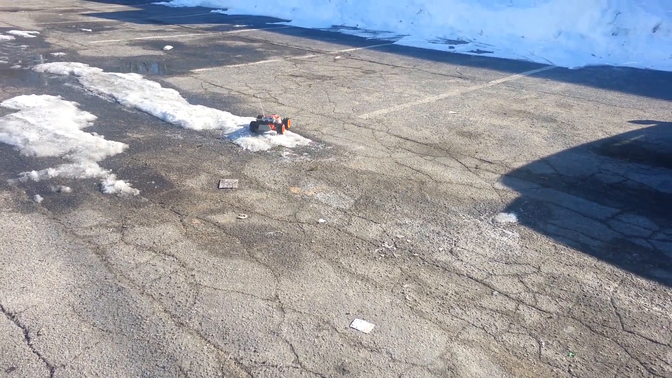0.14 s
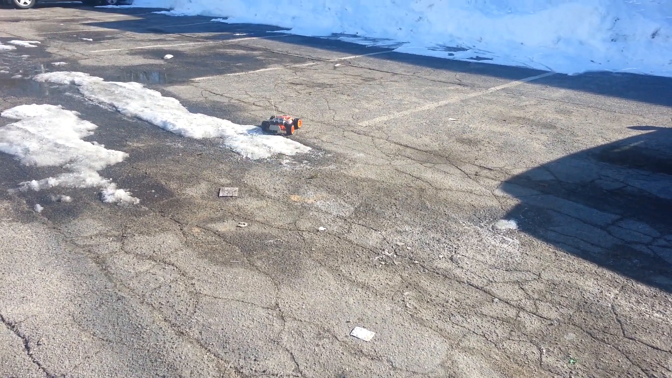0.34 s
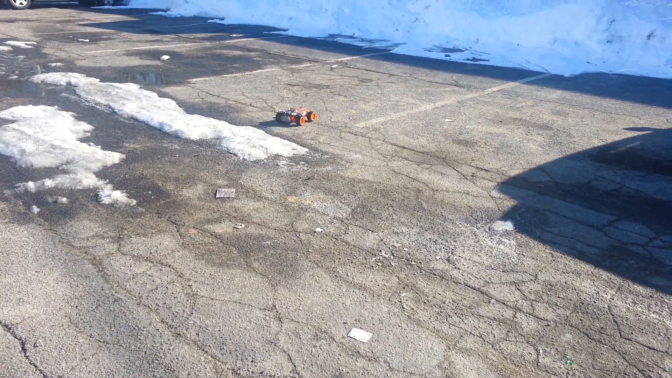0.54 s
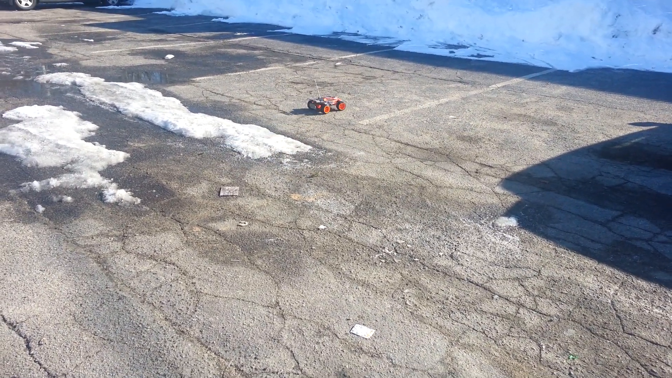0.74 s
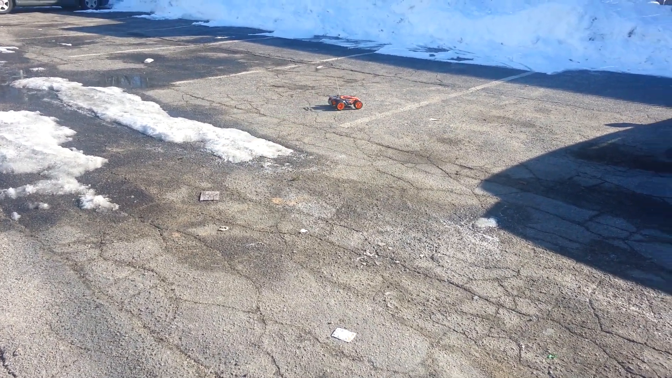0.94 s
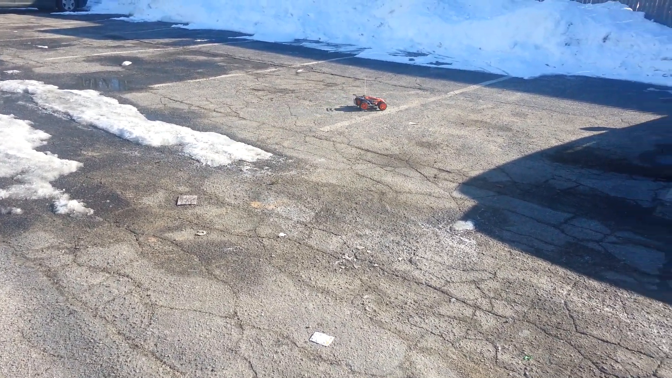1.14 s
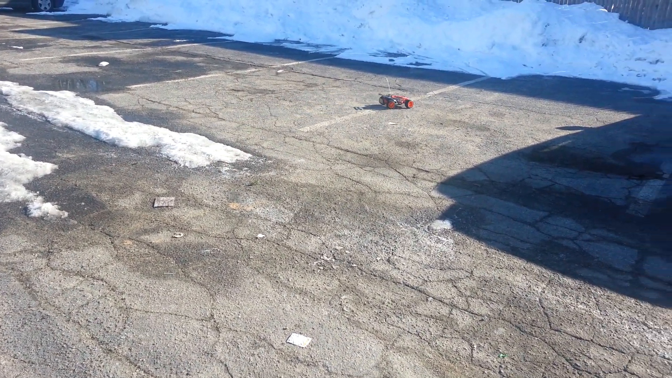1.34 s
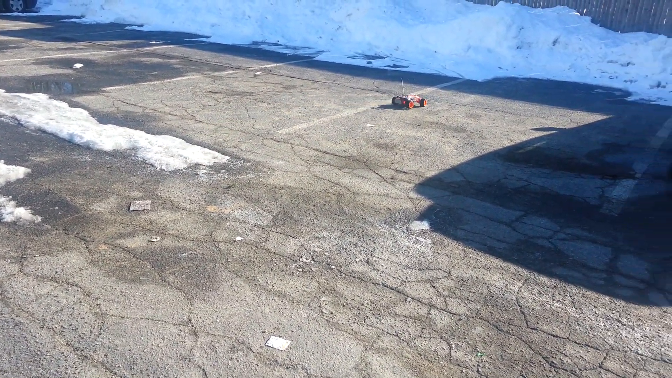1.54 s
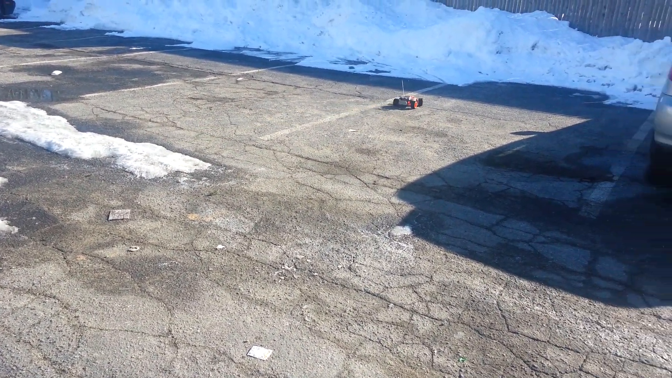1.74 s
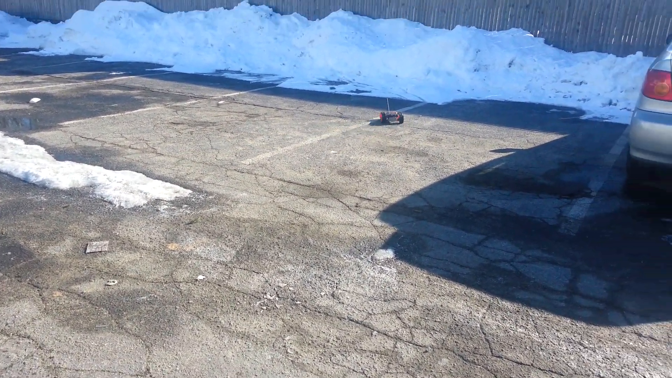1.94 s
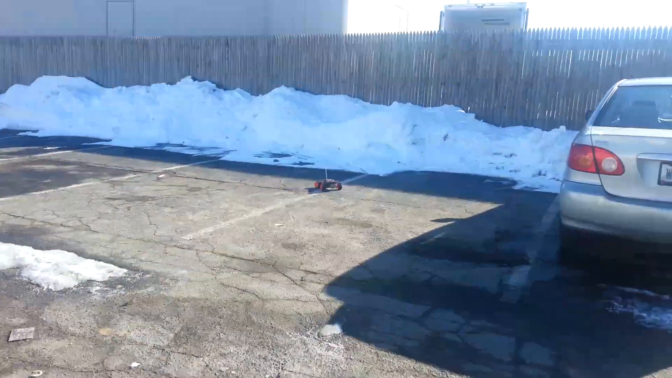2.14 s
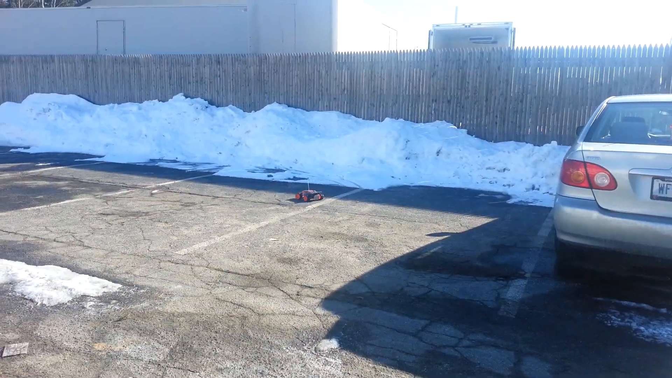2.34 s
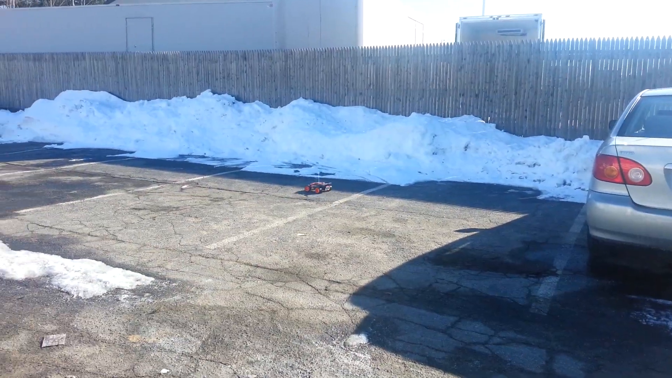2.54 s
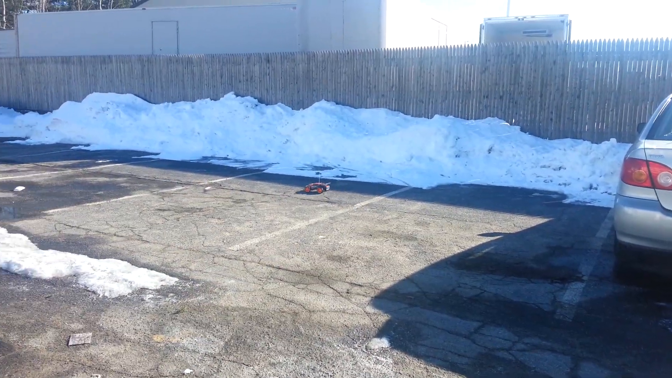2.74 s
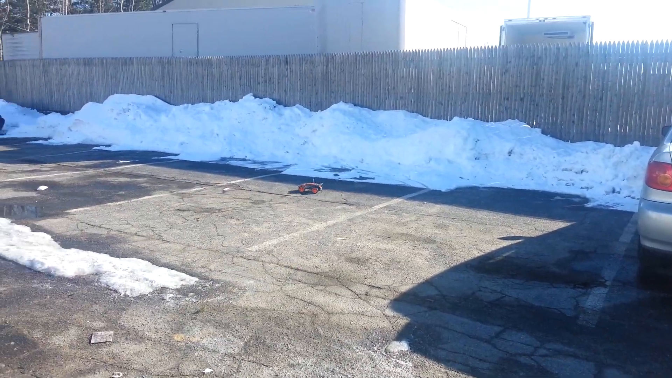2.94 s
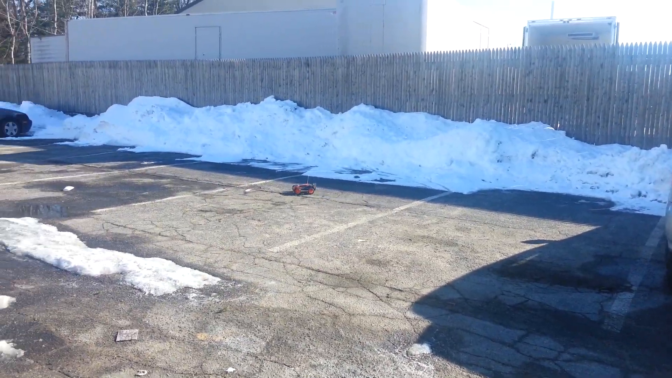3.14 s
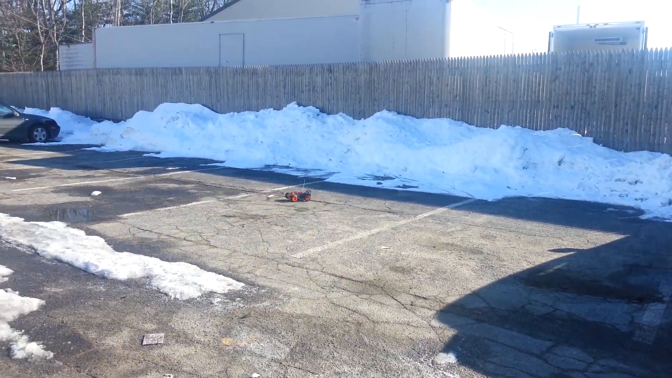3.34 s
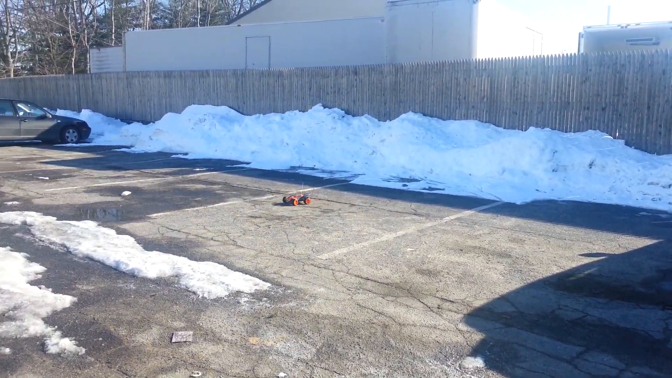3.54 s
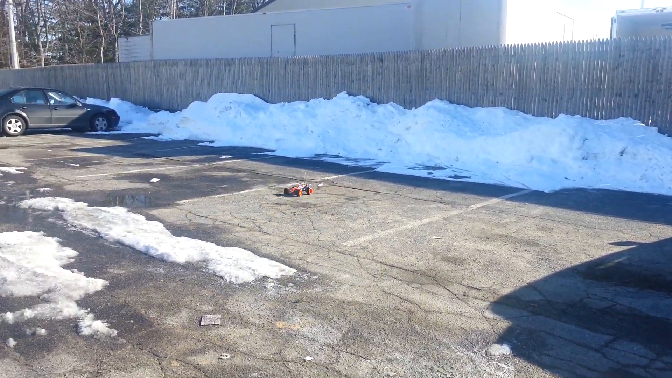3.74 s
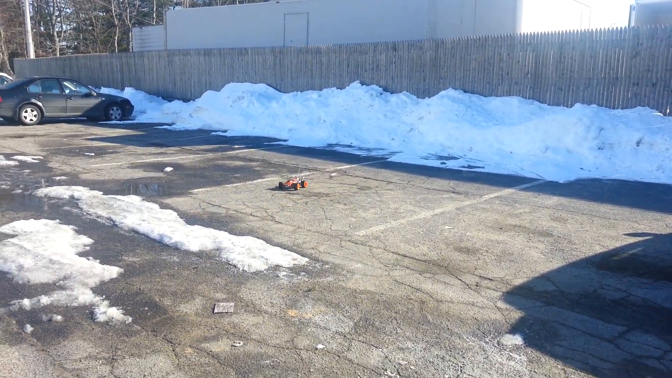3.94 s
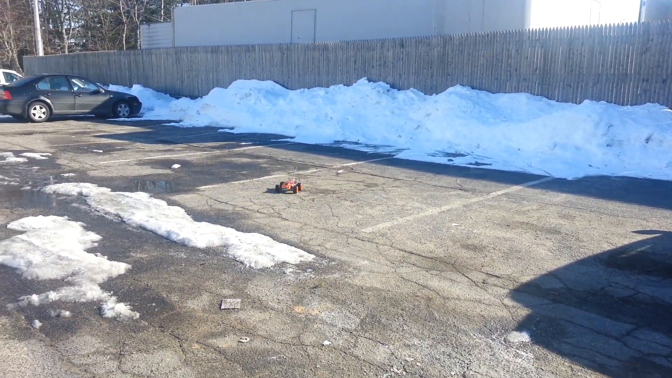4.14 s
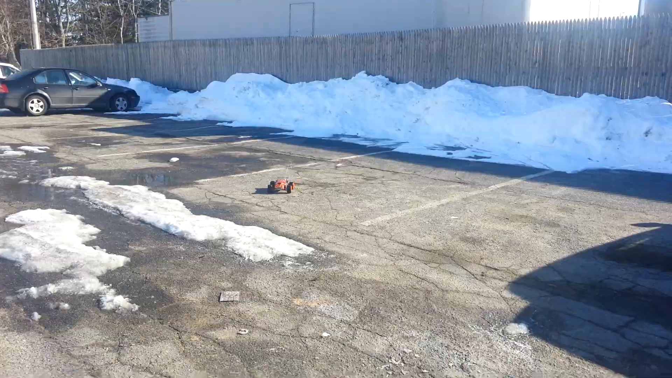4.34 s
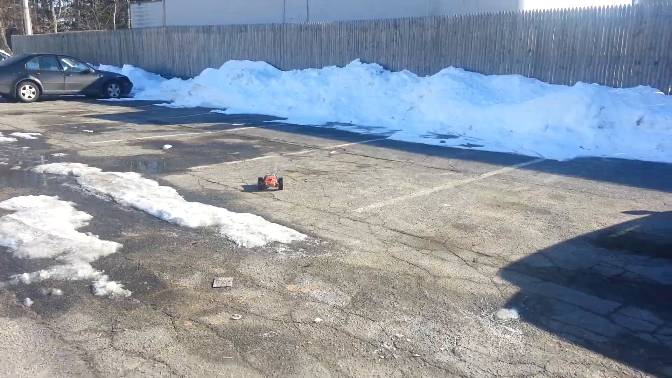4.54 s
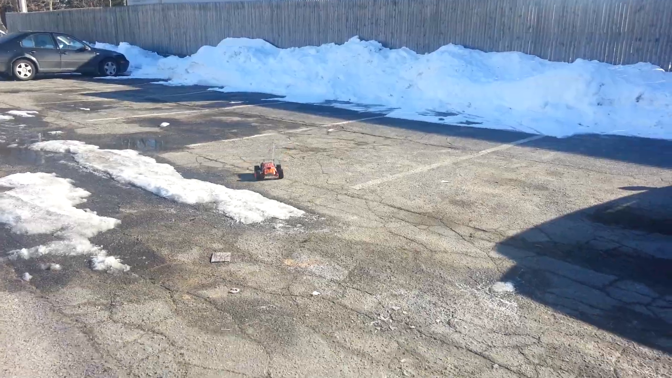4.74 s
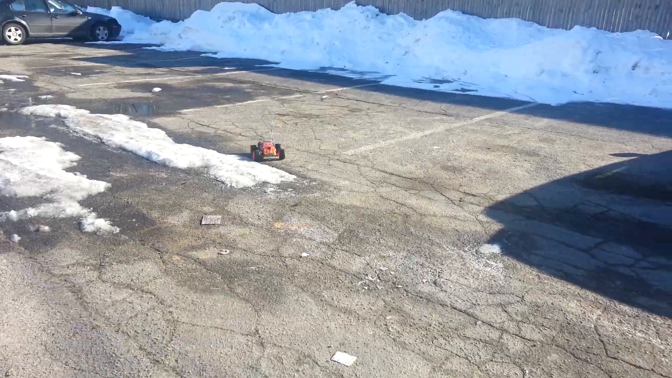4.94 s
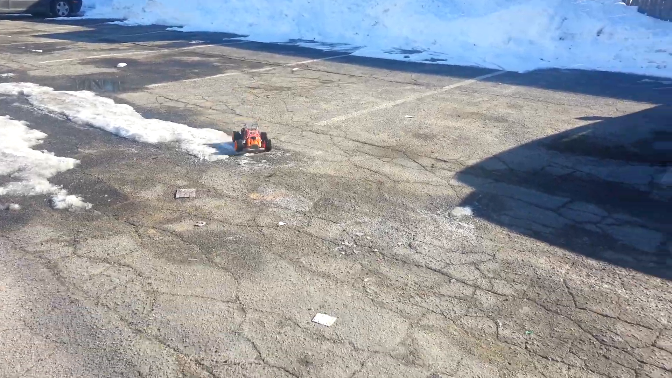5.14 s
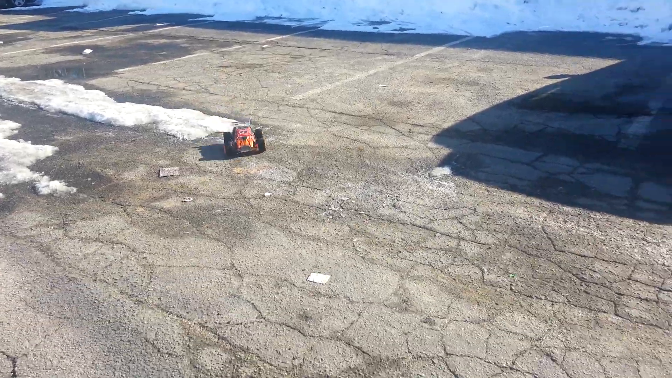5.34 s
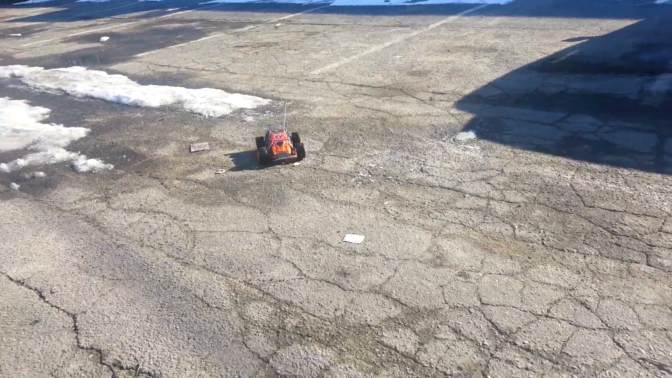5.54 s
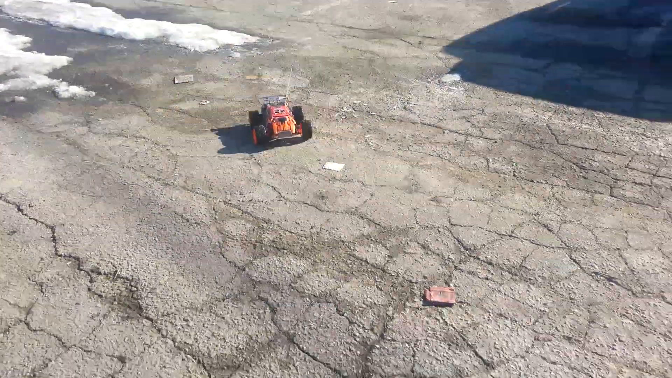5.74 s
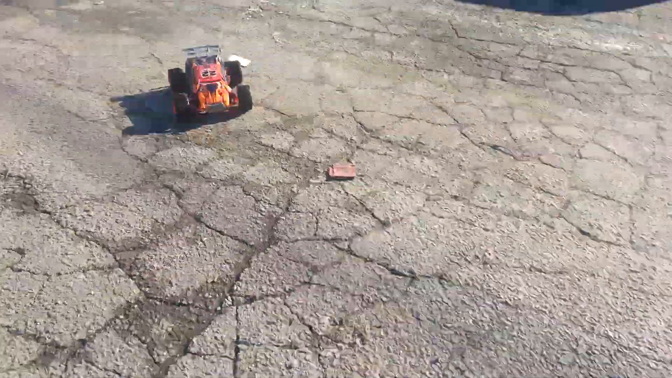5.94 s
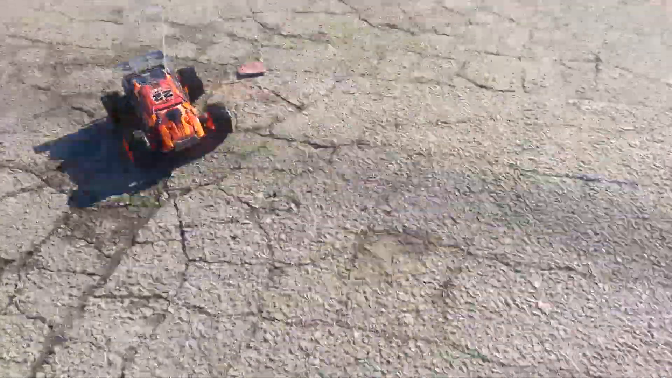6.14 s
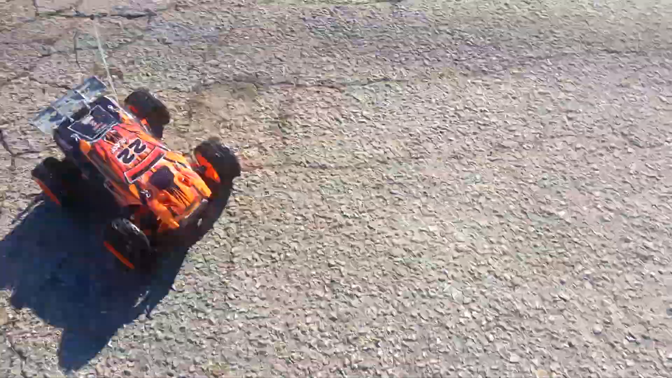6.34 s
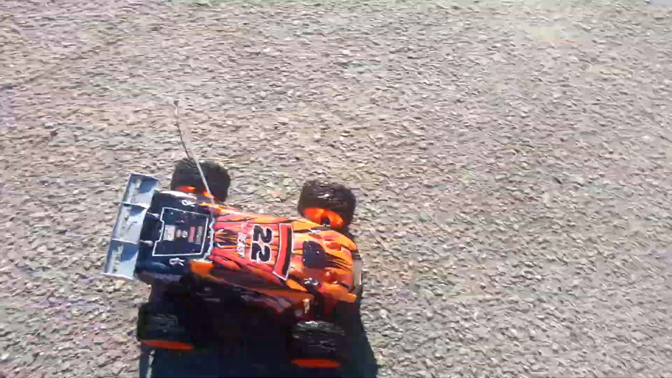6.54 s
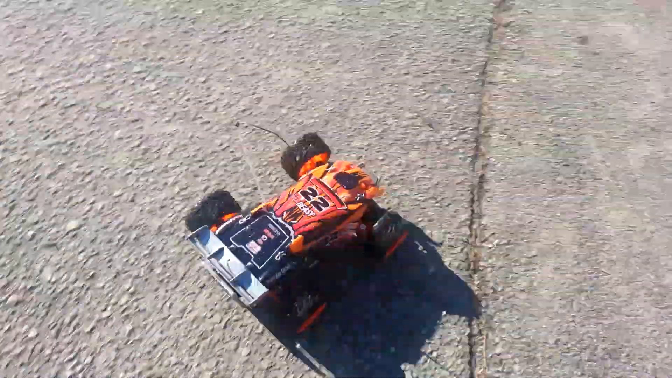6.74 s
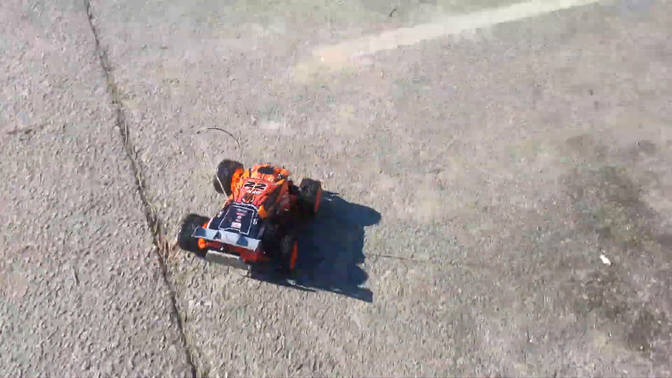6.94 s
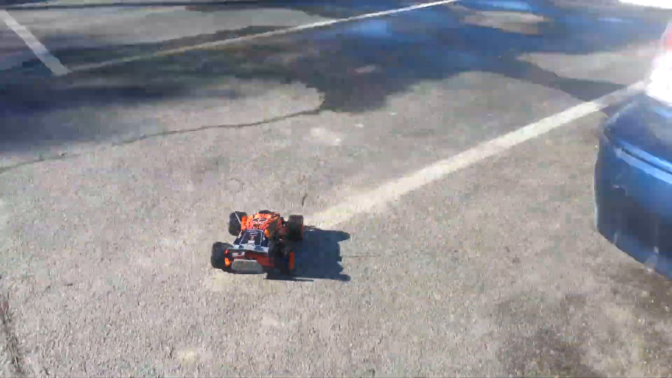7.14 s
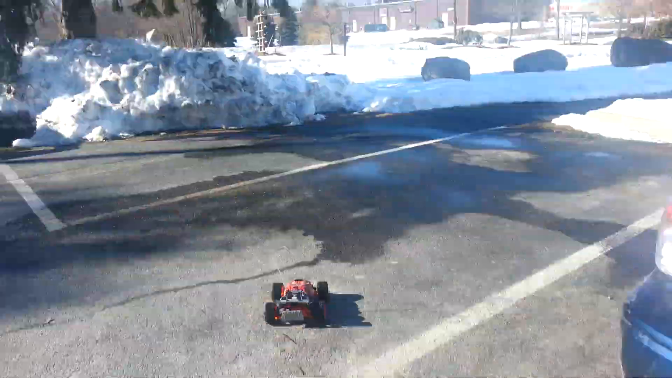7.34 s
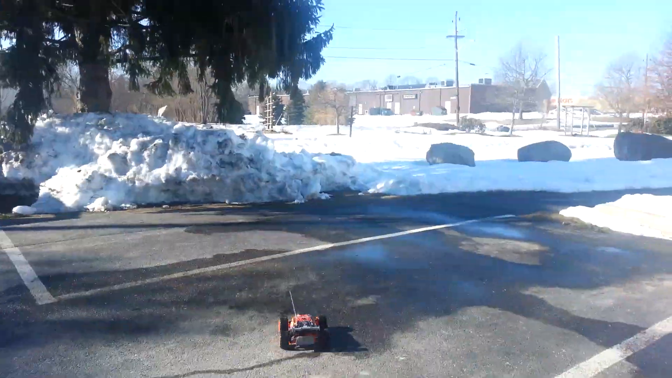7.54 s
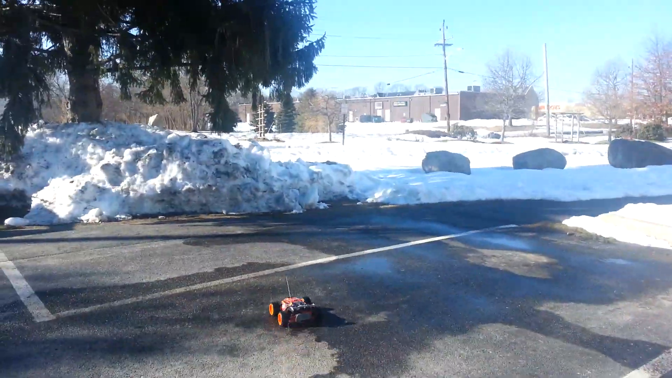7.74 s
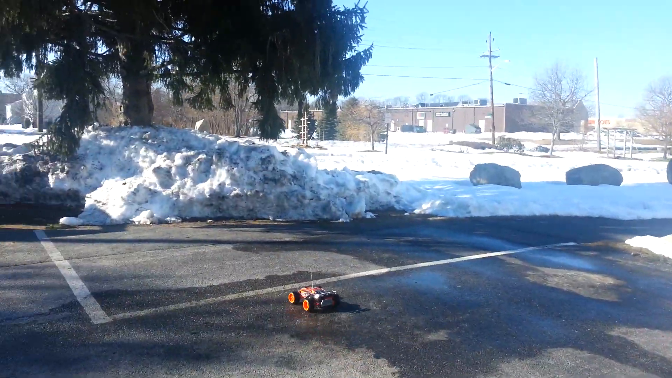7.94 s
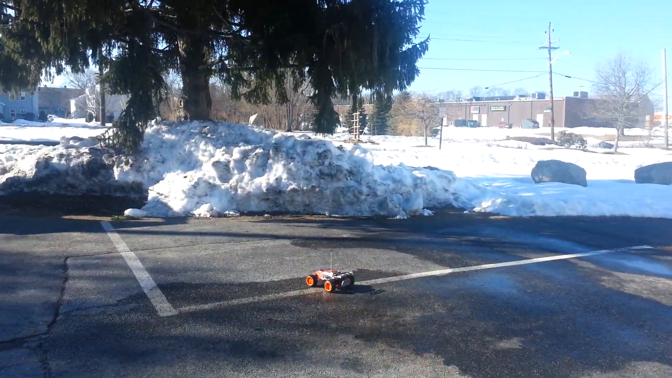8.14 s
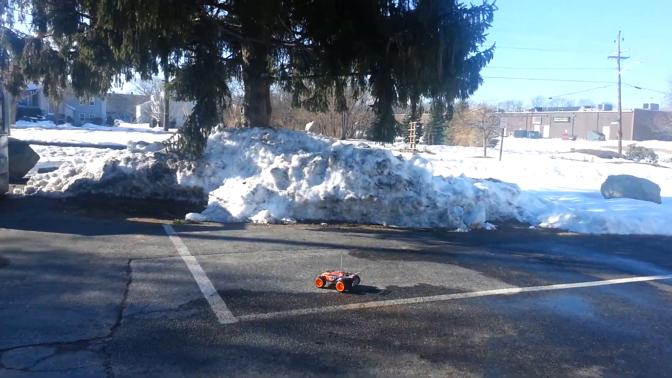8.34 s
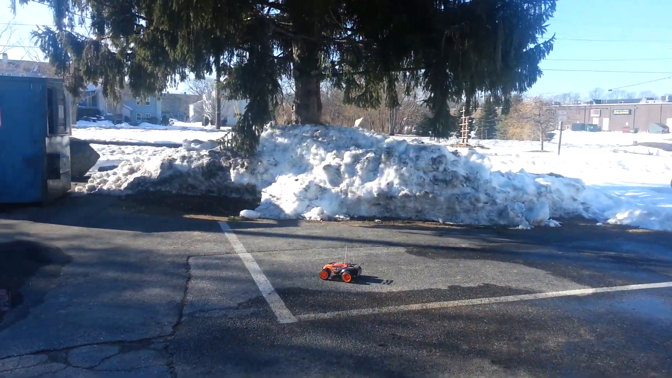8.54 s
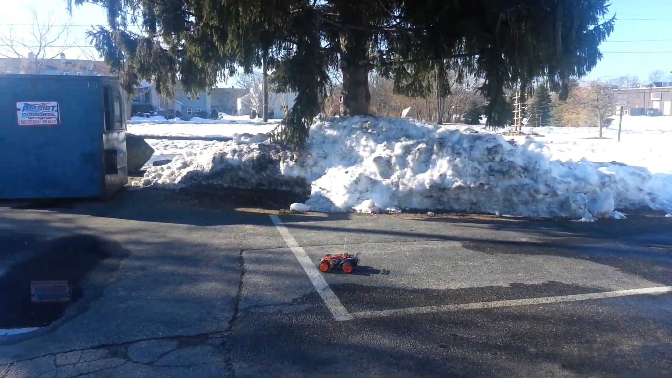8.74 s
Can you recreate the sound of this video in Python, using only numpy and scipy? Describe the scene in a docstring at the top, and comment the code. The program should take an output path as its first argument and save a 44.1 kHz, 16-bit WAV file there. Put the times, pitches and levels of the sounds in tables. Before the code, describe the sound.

A toy buggy's thin electric whine, raspy gears and rattling shell move over rough asphalt, first fairly near, then distant and faint above a soft hum. It comes back louder with quick pitch-bending whines and knocks, peaks loudly close to the handheld stereo microphone with low thuds and air stronger on the left, then drives off, still whining and clacking.

```python
"""A battery toy buggy drives away over cracked asphalt, its gears whining at the motor's speed.
It turns and comes back; the shell rattles, the tyres crunch grit, and the whine swells and bends briefly.
It passes close under the camera with clacks, thumps and a puff of air strongest on the left, then leaves.
Sines make the whines; filtered noise and random blows make the rest, over a faint distant hum."""
import sys
import numpy as np
from scipy import signal
from scipy.fft import rfft, irfft, next_fast_len
from scipy.io import wavfile
from scipy.ndimage import map_coordinates

SR = 44100
rng = np.random.default_rng(int(sys.argv[2]) if len(sys.argv) > 2 else 0)


def wav_record(signal):
    """Record a signal, one row per channel, as 16-bit PCM in the file named by sys.argv[1]."""
    frames = np.transpose(np.atleast_2d(signal))
    bounded = np.clip(frames, -1, 1)
    # unit amplitude maps onto the largest positive 16-bit level
    quanta = np.round(bounded * 32767).astype(np.int16)
    wavfile.write(sys.argv[1], SR, quanta)


N = 387198

# All source levels hold ahead of the port response; spectra give shape only, before each is levelled.
# motor speed: time_s, mesh_pitch_hz
MOTOR_SPEED = [(0, 1295), (.09, 1474), (.115, 1777), (.15, 2015), (.225, 1725), (.27, 1920), (.325, 1772),
               (.4, 1910), (.44, 1620), (.48, 1500), (.505, 1464), (.96, 1471), (1.0, 2086), (1.95, 1898),
               (2.37, 1873), (2.82, 1937), (3.05, 2300), (3.5, 2370), (4.1, 2257), (4.2, 1930),
               (4.26, 2266), (4.41, 2330), (4.43, 1436), (4.7, 1457), (4.8, 1681), (5.03, 1712),
               (5.13, 1910), (5.51, 1798), (5.555, 1940), (5.59, 1830), (5.645, 1953), (5.675, 1864),
               (5.73, 1890), (5.82, 1912), (5.88, 2036), (6.5, 2100), (7.04, 2270), (7.22, 2192),
               (7.28, 1912), (7.55, 1868), (7.78, 1686), (8.05, 1450), (8.27, 1403), (8.36, 1837)]
# loudness of the buggy as it leaves, turns, passes close and leaves: time_s, level_db
NEARNESS_CURVE = [(0, -35.5), (.8, -36), (1.3, -38.5), (1.45, -42), (2, -45), (2.8, -44.5), (3.7, -41.5),
                  (4.3, -41), (4.6, -37.5), (5.25, -36.5), (5.45, -34), (6.3, -28), (6.56, -21),
                  (6.85, -22), (7.2, -30.5), (7.55, -36), (8.2, -37.5), (8.78, -40)]
# mesh tone against the nearness: time_s, level_db
WHINE_CURVE = [(0, -1.5), (.3, -4), (.5, -4), (.75, -2.5), (.85, -11), (1.1, -14), (1.9, -9), (2.1, 2),
               (2.25, -2), (2.4, 1), (2.6, 4), (3.3, -1), (4, -6), (4.36, -2), (4.47, -2), (4.68, -3),
               (5.05, -1.5), (5.43, -2.5), (5.55, 9), (5.715, 5), (5.75, -8), (5.8, 5), (5.9, -7),
               (6.38, -36), (6.55, -9), (6.9, -4.5), (7.2, -6.5), (7.6, -2.5), (7.92, -6), (8.08, -1.5),
               (8.25, -4), (8.33, -5), (8.78, -0.5)]
# brief swells of the whine with their own pitch (bites of the tyres, a motor flare, held notes):
# peak_s, half_height_width_s, pitch_hz, glide_hz_per_s, mesh_db, octave_db, twelfth_db
WHINE_SWELLS = [(.138, 0.021, 1950, 5000, -39, -33, -40), (.168, 0.017, 2000, -10000, -29, -34, -49),
                (0.277, 0.03, 1925, -1500, -30, -33, -41), (.36, 0.016, 1900, 2000, -30.5, -38, -45),
                (0.388, 0.023, 1940, 500, -31, -35, -46), (2.365, 0.013, 1880, -2000, -32, -62, -59),
                (2.495, 0.014, 1930, -2500, -34.5, -55, -55), (3.147, 0.015, 2450, -7000, -40, -57, -57),
                (3.238, .02, 2300, -6000, -37.5, -55, -59), (3.582, 0.017, 2380, -7000, -47, -57, -58),
                (3.67, 0.019, 2350, -8000, -39, -55, -54), (5.138, .028, 1930, 3000, -25.5, -45, -49),
                (5.161, 0.021, 1860, -6000, -27, -49, -50), (5.228, 0.025, 1980, -6000, -25.5, -40, -49),
                (5.291, 0.0171, 1950, -14000, -22.5, -33, -42),
                (5.331, 0.021, 1950, -6000, -21.5, -38, -48), (5.383, .015, 1980, -19000, -19.5, -34, -44),
                (5.488, 0.024, 1880, -7000, -21.5, -36, -42), (5.54, .014, 1890, 4000, -25, -37, -38),
                (5.567, 0.02, 1945, -8000, -22.5, -41, -45), (5.615, .031, 1870, 2000, -23.5, -38, -46),
                (5.642, .016, 2010, 3000, -36, -33, -46), (5.662, 0.0091, 1930, -15000, -21, -35, -44),
                (5.695, 0.027, 1890, 0, -22.5, -40, -46), (5.75, 0.019, 2140, 2000, -42, -30, -48),
                (5.783, 0.016, 1930, -11000, -21, -33, -37), (5.811, 0.021, 1920, -1000, -23, -33, -34),
                (5.843, 0.021, 2020, 1000, -35, -27.5, -32), (5.884, .025, 2070, -1000, -28.5, -28, -33),
                (5.991, 0.019, 2050, 2500, -46, -32, -45), (6.04, .024, 2050, -3500, -28, -27.5, -40),
                (6.41, .014, 2110, -6000, -20, -22, -24.5), (6.443, 0.017, 2130, -6000, -16.5, -19, -22.5),
                (6.479, 0.014, 2110, -7000, -15.5, -25, -23), (6.515, 0.014, 2090, -5000, -14, -24, -22),
                (6.548, .014, 2130, -5000, -13, -12, -24), (6.578, 0.016, 2100, -4500, -11, -16, -27),
                (6.622, 0.012, 2140, -4500, -13, -19.5, -27), (6.646, .013, 2090, -5500, -12, -16, -23.5),
                (6.686, 0.037, 2180, -500, -22, -19, -35.5), (6.73, 0.029, 2150, -1000, -18, -20, -27),
                (6.768, 0.021, 2270, -3000, -18, -15.5, -26), (6.838, .022, 2130, -6000, -27, -21, -24),
                (6.815, 0.017, 2290, -4000, -20, -25, -33), (6.894, 0.026, 2235, -1000, -27, -20.5, -37),
                (6.962, 0.036, 2225, -500, -28, -22, -41), (7.014, .014, 2430, -2000, -28, -17, -41),
                (7.052, 0.0266, 2280, -1000, -29, -23, -40.5), (7.092, .02, 2260, -2500, -31, -27, -42),
                (7.136, .018, 2230, -3500, -33, -29, -42), (7.202, 0.024, 2270, -3500, -33, -29, -45)]
# what the gearbox radiates at each pitch: freq_hz, gain_db
GEARBOX_GAIN = [(1250, -3), (1440, 3.5), (1600, -3), (1720, -0.5), (1900, -2.5), (2300, -0.5),
                (2900, -12.5), (3500, -15), (4000, -10.5), (4250, -9.5), (4500, -9), (4700, -27),
                (4870, -9), (5050, -1), (5500, -13), (6300, -11), (6700, -23), (7200, -34)]
# how far the revs swing and how rough the whine sounds, from moment to moment:
# time_s, rev_swing (factor), whine_roughness (factor)
DRIVE_UNEVENNESS = [(0, 0.71, 0.41), (.6, .65, .6), (1.2, 0.96, 1), (2, .5, .7), (2.85, .5, .65),
                    (3.15, 1.03, .55), (4.3, 1, .6), (4.5, .55, .6), (5.1, .7, 0.39), (5.5, .45, .1),
                    (6.3, .5, .2), (6.7, .5, .2), (7.2, 0.61, .25), (7.6, .8, .8), (8.05, .35, .3),
                    (8.3, .4, .4), (8.78, .7, 0.78)]
# stretches of stronger rattle, rasp and grit, from wheelspin or scrabbling tyres:
# start_s, end_s, rattle_gain_db, rasp_gain_db, grit_gain_db
HARSH_STRETCHES = [(0.145, 0.47, 2.5, 2.5, 5), (1.256, 1.345, 4, 4, 3), (1.583, 1.811, 3, 1.5, 3.5),
                   (5.065, 5.354, 2, 1.5, 4.5), (6.015, 6.204, 1, 0.5, 2.5), (6.975, 7.243, 0, 0.5, 4),
                   (7.249, 7.803, 0.5, 1.5, 0.5)]
# fainter rough tones beside the main whine, from gears, shell or scrubbing tyres:
# start_s, end_s, pitch_hz, level_db (over the nearness)
SIDE_TONES = [(.16, .22, 902, -3), (.4, .445, 883, -3), (.44, .5, 5200, -13), (0.452, 1.42, 1988, -14),
              (0.699, 1.95, 2370, -5), (.75, 1.402, 2877, -10), (.75, 1.445, 947, -9.5),
              (.8, 1.4, 3383, -16), (1.402, 2.3, 2870, -6), (1.5, 1.95, 1900, -6),
              (2.049, 2.487, 2348, 0.5), (2.2, 3.6, 948, -10), (2.5, 3.7, 6230, -14),
              (2.9, 3.65, 3890, -10), (3, 4.4, 2350, -7), (3.65, 4.4, 1920, -7), (3.7, 4.45, 2840, -9),
              (3.75, 4.4, 1421, -7), (4.42, 5.05, 1911, -3.5), (4.4, 4.801, 2323, -15),
              (4.4, 5.052, 2870, -16), (4.7, 5.079, 5114, -15), (7.268, 7.5, 5750, -11),
              (7.27, 7.9, 2900, -9.5), (7.699, 7.871, 4970, -8), (7.899, 8.352, 1917, -1.5),
              (7.951, 8.749, 2423, -6.5), (7.9, 8.45, 2860, -10), (7.96, 8.452, 6510, -8),
              (8.4, 8.779, 6390, -14)]
# modes of the plastic shell and chassis: freq_hz, width_hz, gain_db
SHELL_MODES = [(547.5, 103, 6.5), (827, 186, -7), (957, 210, 1), (1408, 300, -0.5), (1892, 374, 2),
               (2298, 120, -1), (2780, 270, -2), (3510, 130, -38), (4270, 250, -7.5)]
# tyre rumble and scrub: freq_hz, level_db_per_hz
TYRE_SPECTRUM = [(30, -40), (70, -31), (120, -15), (210, 1.5), (320, -6.5), (450, -5.5), (750, 0.5),
                 (1300, -4), (2500, -11.5), (4000, -36), (8000, -70)]
# gear rasp: freq_hz, level_db_per_hz
RASP_SPECTRUM = [(1200, -35), (2200, -8), (2850, -4), (3120, -4.5), (3450, 0.5), (3700, -1.5), (4000, 0),
                 (4550, -0.5), (5500, -4), (6300, -3.5), (7300, -10), (10000, -44)]
# crunching grit: freq_hz, level_db_per_hz
GRIT_SPECTRUM = [(3000, -30), (6000, -39), (7500, 6), (8700, 7.5), (10000, 3.5), (11300, 2), (12500, -3),
                 (14600, -14.5)]
# bass in the rolling: time_s, gain_db
RUMBLE_CURVE = [(0, -6), (.7, -1.5), (1.25, 3), (1.7, -1.5), (2.6, 4.5), (4, 1), (5.2, -0.5), (6.6, 0),
                (7.3, 2), (8.78, 0)]
# treble, dullest while the buggy heads for the listener from afar: time_s, gain_db
TREBLE_CURVE = [(0, 3), (.8, 1.5), (1.8, -0.5), (3.5, 0.5), (4.2, -2), (4.7, -2), (5.2, 1), (6.5, -0.5),
                (7.5, 2.5), (8.78, -0.5)]
# plastic clacks and flicked stones: start_s, ring_peak_db, ring_hz, main_t60_s, crack_db (against the ring)
CLACK_EVENTS = [(.614, -15, 3800, .012, -25), (.628, -11, 3335, 0.011, -8), (0.631, -17, 3400, .02, -22),
                (.645, -16.5, 3910, 0.016, -18), (.656, -12.5, 3510, 0.017, -23),
                (.666, -22, 3670, .035, -24), (.674, -18, 3200, .025, -26), (.685, -20.5, 3520, .025, -26),
                (1.016, -29, 2300, 0.0073, 1), (1.282, -29, 1966, .004, -18),
                (1.2967, -22.5, 1992, 0.0043, -18), (1.961, -30, 3700, .008, -22),
                (2.0012, -35, 2075, 0.009, -26), (2.362, -30.5, 1886, 0.0083, -30),
                (2.492, -31, 1930, .006, -28), (3.856, -26.5, 2940, 0.012, -25),
                (3.97, -24.5, 2976, .011, -26), (4.19, -33, 5000, .005, -12),
                (4.734, -27.5, 2610, 0.0091, -22), (4.983, -30, 5000, 0.0041, -6),
                (5.464, -12, 1908, 0.0057, -26), (5.476, -10, 1495, .006, -26),
                (5.7678, -16, 1688, .009, -24), (6.136, -12.5, 1440, 0.017, -20),
                (6.5106, -12, 2023, 0.0064, -15), (6.7541, -10, 4540, .004, -16),
                (6.833, -12, 2134, 0.0044, -14), (7.45, -11, 3505, 0.011, -8.5),
                (7.661, -26, 998, .02, -20), (8.4346, -23, 2292, .009, -22),
                (8.6355, -20.5, 1840, 0.0066, -25)]
# stiff chassis parts that colour the clacks: freq_hz, width_hz, gain_db
STRUT_MODES = [(2689, 178, -3), (3830, 48, 7), (4470, 220, 2)]
# chassis landing on its springs: start_s, peak_db, thud_hz, t60_s
LANDINGS = [(5.476, -25, 300, 0.056), (5.507, -28, 230, .05), (5.532, -22.5, 199, .05),
            (5.765, -20.5, 300.4, 0.054), (5.783, -23.5, 232, 0.053), (6.036, -23, 378, 0.057),
            (6.132, -19.5, 260, .05), (6.165, -21, 239.5, 0.048), (6.206, -17.5, 249, 0.053),
            (6.789, -16, 250, 0.047), (6.833, -16, 250, 0.06), (6.875, -21, 250, 0.041),
            (8.309, -28, 320, .07), (8.324, -28, 521, .07), (8.336, -34, 597, 0.046)]
# the two ports: freq_hz, left_minus_right_db, noise_likeness (share of power)
PORT_DIFFERENCE = [(100, 0, 0.55), (536, 0, 0.92), (970, 1.5, 0.65), (1280, 5.5, 0.81), (1790, 7, 0.64),
                   (2740, 2, 0.41), (3660, -3, 0.23), (4450, -9, 0.58), (5600, -1, 0.05),
                   (6370, 0.5, 0.054), (7450, -1.5, 0.015), (10600, 6.5, 0.073), (13200, -5, 0.093)]
# arrival at the left port against the right: time_s, left_lag_ms
PORT_LAG = [(0, 0.047), (1.2, 0.02), (1.8, -0.059), (3.2, -0.0012), (4.5, 0.062), (5.6, 0.058), (6.3, 0.15),
            (7.1, 0.12), (7.6, 0.11), (8.78, 0.055)]
# response of both ports: freq_hz, gain_db
PORT_RESPONSE = [(500, 0.5), (1200, 5), (2000, 3), (4300, 0.5), (7000, -1), (14000, 10)]
# puff of air, before its wobble and port gains: time_s, level_db
PUFF_CURVE = [(6.3, -102), (6.5, -81), (6.72, -57), (6.78, -23), (6.87, -30), (6.95, -42), (7.07, -59),
              (7.3, -61)]
# puff of air: freq_hz, level_db_per_hz
AIR_SPECTRUM = [(15, -29.5), (40, -23), (90, 0.5), (160, 1), (330, -1.5), (600, -17), (2000, -80)]
# distant hum: freq_hz, level_db_per_hz
HUM_SPECTRUM = [(20, -30), (45, -12.5), (75, -4.5), (140, -5), (300, -6.5), (900, -6.5), (2500, -6.5),
                (14000, -60)]

MID_DB = -34  # nearness at middle distance, where the offsets below hold
# each layer: offset_db over the nearness, growth in dB per dB of nearness
TYRE_LAW, SHELL_LAW, RASP_LAW, GRIT_LAW = (-10.5, 1.26), (-0.35, 1), (-4.5, 1.19), (-15.5, 1.136)
OCTAVE_LAW, TWELFTH_LAW = (1.8, 2.14), (-1.9, 1.9)
WARBLE, WANDER = 0.0368, .018  # pitch shares at full swing: slip cycle, slow drift
BUZZ_DB = 3.5  # fast buzz on the mesh tone at full roughness
HARSH_EDGE_S = 0.018
HUM_DB = -50
TOP_HZ = 14750  # band limit


def amp(db):
    """Decibels to an amplitude factor."""
    return 10 ** (np.asarray(db) / 20)


def unit(x):
    """x at rms 1."""
    return x / np.sqrt(np.mean(x ** 2) + 1e-20)


def along(points, hz, axis=1):
    """One column of a frequency table, read on a log axis."""
    cols = np.transpose(points)
    return np.interp(np.log(hz + 1), np.log(cols[0] + 1), cols[axis])


def curves(rows):
    """One value per sample for each column after the time."""
    s, *cols = np.transpose(rows)
    return [np.interp(np.arange(N) / SR, s, c) for c in cols]


def wobble(rate):
    """A smooth random curve, rate knots a second."""
    knots = rng.standard_normal(int(N * rate / SR) + 4)
    return map_coordinates(knots, [np.arange(N) * rate / SR])


def filtered(x, response):
    """x filtered by a real or complex response of frequency."""
    m = next_fast_len(N + SR // 2)
    return irfft(rfft(x, m) * response(np.fft.rfftfreq(m, 1 / SR)), m)[..., :N]


def coloured(x, spectrum):
    """x shaped by the given spectrum, at rms 1."""
    return unit(filtered(x, lambda hz: amp(along(spectrum, hz))))


def resonance(hz, centre, width):
    """Causal response of one mode."""
    return 1j * hz * width / (centre ** 2 - hz ** 2 + 1j * hz * width)


def level_db(law):
    """A layer's level: its offset at middle distance, plus its growth with nearness."""
    offset_db, growth = law
    return MID_DB + offset_db + growth * (curves(NEARNESS_CURVE)[0] - MID_DB)


def slipping(rate):
    """Tyres slip and bite in uneven cycles: the revs (about -1 to 1) jump up, then sag as the load peaks."""
    turns = np.cumsum(rate * amp(3 * wobble(25))) / SR
    angle = 2 * np.pi * turns
    revs = np.sin(angle) + 0.35 * np.sin(2 * angle)
    load = unit(-np.cos(angle) + 1.65 * wobble(50))
    return revs, load


def swelling():
    """Brief swells of the whine: three partials' amplitudes, their hold on the pitch, and their own pitch."""
    t = np.arange(N) / SR
    swells = np.zeros((3, N))
    hold, weighted_hz = np.zeros((2, N))
    for s, length, hz, glide, *partial_db in WHINE_SWELLS:
        near = abs(t - s) < 2 * length
        u = t[near] - s
        bell = np.exp(-4 * np.log(2) * (u / length) ** 2)
        swells[:, near] += np.outer(amp(partial_db), bell)
        hold[near] += np.sqrt(bell)
        weighted_hz[near] += np.sqrt(bell) * (hz + glide * u)
    return swells, hold, weighted_hz / (hold + 1e-12)


def harsh_gains():
    """Extra dB of rattle, rasp and grit in the harsh stretches."""
    t = np.arange(N) / SR
    extra = np.zeros((3, N))
    for start, end, *extra_db in HARSH_STRETCHES:
        gate = np.clip(np.minimum(t - start, end - t) / HARSH_EDGE_S + .5, 0, 1)
        extra += np.outer(extra_db, gate)
    return extra


def gears(revs, load):
    """The mesh tone warbles with the revs and rings through the gearbox; each swell takes over its pitch."""
    (speed_hz,), (near_db,), (whine_db,) = curves(MOTOR_SPEED), curves(NEARNESS_CURVE), curves(WHINE_CURVE)
    swells, hold, swell_hz = swelling()
    swells = swells * unit(amp(2.3 * wobble(260)))
    free = np.clip(1 - 2 * hold, 0, 1)  # 1 between swells, 0 within
    swing, rough = curves(DRIVE_UNEVENNESS)
    free_hz = speed_hz * (1 + swing * (WARBLE * revs + WANDER * wobble(30)))
    pitch_hz = free * free_hz + (1 - free) * swell_hz
    chatter = rough * (.03 * wobble(60) + .05 * wobble(400))
    phase = 2 * np.pi * np.cumsum(pitch_hz * (1 + chatter)) / SR
    mesh_db = near_db + whine_db + along(GEARBOX_GAIN, speed_hz)
    flutter_db = 3.2 * swing * load + BUZZ_DB * rough * wobble(300)
    steady = amp(mesh_db) * unit(amp(flutter_db))
    mesh = np.hypot(steady, swells[0]) * np.sin(phase)
    # between swells the overtones chirp as the teeth press together, and grow with the rasp in harsh stretches
    strain_db = harsh_gains()[1]
    for k, law in ((2, OCTAVE_LAW), (3, TWELFTH_LAW)):
        press = free * unit(amp(2.8 * load + 2.5 * wobble(40)))
        chirps = amp(level_db(law) + strain_db + along(GEARBOX_GAIN, k * pitch_hz)) * press
        mesh += np.hypot(chirps, swells[k - 1]) * np.sin(k * phase + .28 * wobble(900))
    return mesh


def side_tones(revs):
    """Fainter broken, rough tones beside the main whine follow the same swings of the revs."""
    out = np.zeros(N)
    for start, end, hz, db in SIDE_TONES:
        span = slice(round(start * SR), round(end * SR))
        pitch_hz = hz * (1 + .014 * revs[span] + .036 * wobble(450)[span])
        fade = signal.windows.tukey(len(pitch_hz), .3)
        flutter = unit(amp(3.5 * wobble(200)[span])) * fade
        out[span] += amp(db) * flutter * np.sin(2 * np.pi * np.cumsum(pitch_hz) / SR)
    return amp(curves(NEARNESS_CURVE)[0]) * out


def impacts(rate, spread_db, smooth):
    """Random tiny blows, rate a second, on friction noise; rows: direct sound, left scatter, right scatter."""
    hits = rng.random(N) < rate / SR
    blows = hits * amp(spread_db * np.clip(rng.standard_normal(N), -2, 2))
    signed = blows * np.sign(rng.standard_normal((3, N)))
    return unit(unit(signed) + smooth * rng.standard_normal((3, N)))


def shell_response(hz):
    """The shell's modes ring together, and it radiates poorly at both ends of the range."""
    body = sum(amp(db) * resonance(hz, centre, width) for centre, width, db in SHELL_MODES)
    return body * (hz ** 2 / (hz ** 2 + 300 ** 2) / (1 + (hz / 4500) ** 6))


def rolling(load):
    """Tread and gear teeth drum on the shell and rasp; the tyres rumble, scrub and crunch grit."""
    tyre_db = level_db(TYRE_LAW) + curves(RUMBLE_CURVE)[0]
    shell_db, rasp_db, grit_db = harsh_gains() + [level_db(law) for law in (SHELL_LAW, RASP_LAW, GRIT_LAW)]
    shell = unit(filtered(impacts(rate=900, spread_db=3, smooth=0.94), shell_response))
    tyres = coloured(impacts(rate=300, spread_db=1.0, smooth=1.0), TYRE_SPECTRUM)
    rasp = coloured(impacts(rate=1600, spread_db=9.5, smooth=1.55), RASP_SPECTRUM)
    grit = coloured(impacts(rate=1500, spread_db=10.0, smooth=2.4), GRIT_SPECTRUM)
    treble_db, = curves(TREBLE_CURVE)
    low = amp(tyre_db + 2.5 * wobble(40)) * tyres + amp(shell_db + 1.28 * load) * shell
    high = amp(rasp_db + 1.72 * load) * rasp + amp(grit_db + load + 1.33 * wobble(90)) * grit
    return low + amp(treble_db) * high


def knocks():
    """A clack is a crack with a brief ring and a trailing buzz; a landing is a short low thud."""
    t = np.arange(N // 40) / SR
    out = np.zeros(N + len(t))
    hz = np.fft.rfftfreq(len(t), 1 / SR)
    struts = 1 + sum(amp(db) * resonance(hz, centre, width) for centre, width, db in STRUT_MODES)
    for s, db, ring_hz, t60, crack_db in CLACK_EVENTS:
        decay = amp(-60 * t / t60) + .1 * amp(-60 * t / (5 * t60))
        blow = rng.standard_normal(len(t)) * decay
        ring = irfft(rfft(blow) * resonance(hz, ring_hz, 0.62 * ring_hz) ** 2 * struts, len(t))
        crack = np.gradient(blow)  # the slope of the blow is its bright edge
        clack = ring / abs(ring).max() + amp(crack_db) * crack / abs(crack).max()
        out[round(s * SR):][:len(t)] += amp(db) * clack
    for s, db, thud_hz, t60 in LANDINGS:
        blow = rng.standard_normal(len(t)) * amp(-60 * t / t60)
        body = resonance(hz, thud_hz, .92 * thud_hz) * resonance(hz, 525, 770)
        thud = irfft(rfft(blow) * body, len(t))
        out[round(s * SR):][:len(t)] += amp(db) * thud / abs(thud).max()
    return out[:N]


def scatter(x):
    """Short reflections off the lot, as decaying noise tails; their share changes with the buggy's place."""
    t = np.arange(SR // 16) / SR
    tails = rng.standard_normal((2, len(t))) * amp(-60 * t / 0.044)  # t60 in seconds
    tails /= np.linalg.norm(tails, axis=1, keepdims=True)
    place_s = [0, 2.5, 4.5, 5.5, 6.6, 7.1, 8.5]
    wet_db = np.interp(np.arange(N) / SR, place_s, [2.0, -9.5, 2.5, -1, -5.5, 2.0, -5.5])
    return amp(wet_db) * signal.oaconvolve(x[None], tails, axes=1)[:, :N]


def ports(clear, noise):
    """Direct sound meets the two ports with a drifting lag; the scatter differs between them."""
    def alike(hz):
        return np.clip(along(PORT_DIFFERENCE, hz, axis=2), 0, 1)

    def shade(hz):
        return amp(np.outer([.5, -.5], along(PORT_DIFFERENCE, hz)))

    direct = clear + filtered(noise[0], lambda hz: np.sqrt(alike(hz)))
    # long waves scatter little off the rough asphalt
    echoes = filtered(scatter(.5 * (clear + direct)), lambda hz: hz ** 2 / (hz ** 2 + 1000 ** 2))
    diffuse = echoes + amp(-1.5) * filtered(noise[1:], lambda hz: np.sqrt(1 - alike(hz)))
    lag = curves(PORT_LAG)[0] * SR / 1000  # in samples
    left = map_coordinates(direct, [np.arange(N) - lag], order=3)
    pair = np.array([left, direct]) + diffuse
    # the camera body shades each port differently
    return filtered(pair, lambda hz: amp(along(PORT_RESPONSE, hz)) * shade(hz) / shade(hz).mean(axis=0))


def outdoors():
    """A distant hum of partly shared noise, and a gusting puff of air, stronger on the left."""
    hum = coloured(rng.standard_normal(N) + .5 * rng.standard_normal((2, N)), HUM_SPECTRUM)
    passing = np.interp(np.arange(N) / SR, [6.2, 6.4, 7.2, 7.4], [0, 1, 1, 0])
    gust = passing * amp(curves(PUFF_CURVE)[0] + 1.46 * wobble(24))
    puff = gust * coloured(rng.standard_normal((2, N)), AIR_SPECTRUM)
    return amp(HUM_DB) * hum + amp([[6], [-8]]) * puff


def scene():
    """The buggy at the two ports, over the air of the lot."""
    revs, load = slipping(rate=30)
    clear = gears(revs, load) + side_tones(revs) + knocks()
    return ports(clear, rolling(load)) + outdoors()


def record(dry):
    """The camera clips at full scale, then cuts steeply above its band limit."""
    return filtered(np.clip(dry, -1, 1), lambda hz: 1 / np.sqrt(1 + (hz / TOP_HZ) ** 300))


dry = scene()
out = record(dry)
wav_record(out)
```